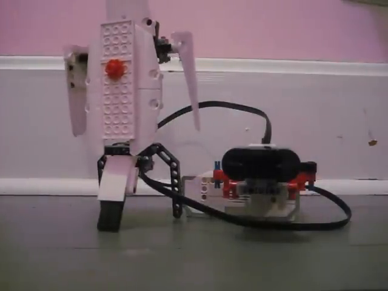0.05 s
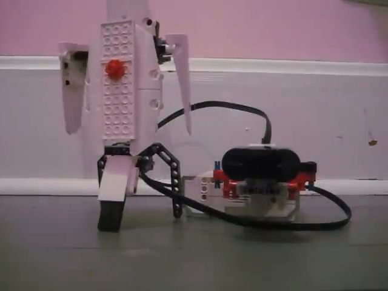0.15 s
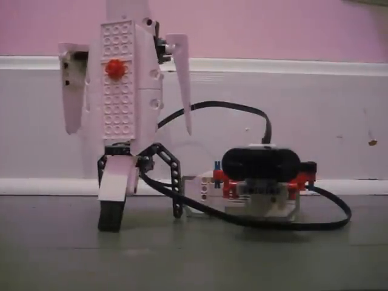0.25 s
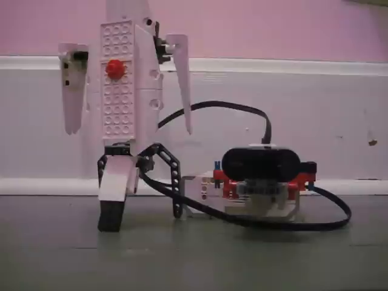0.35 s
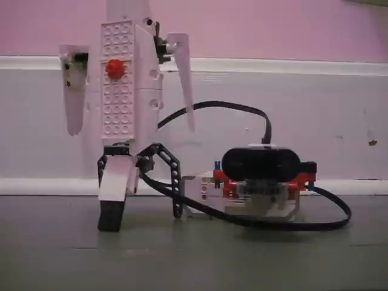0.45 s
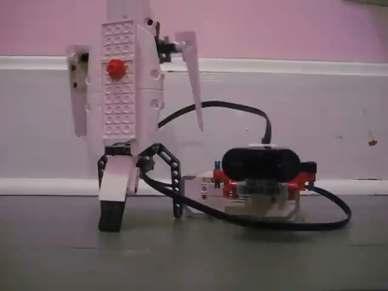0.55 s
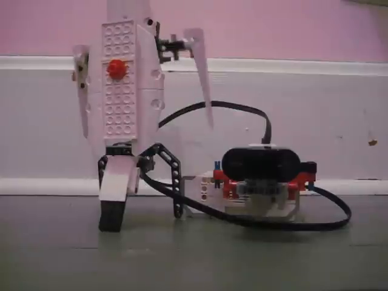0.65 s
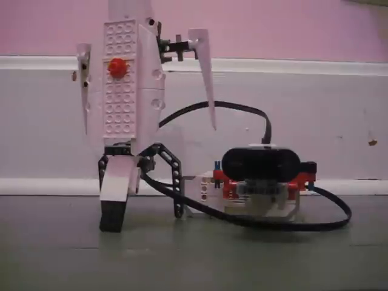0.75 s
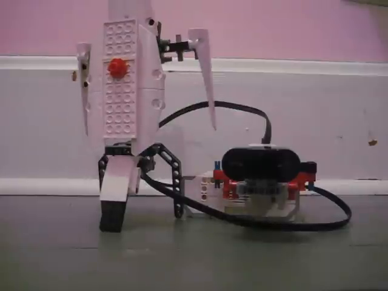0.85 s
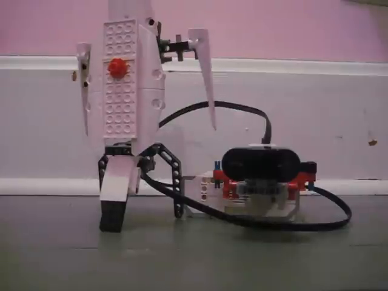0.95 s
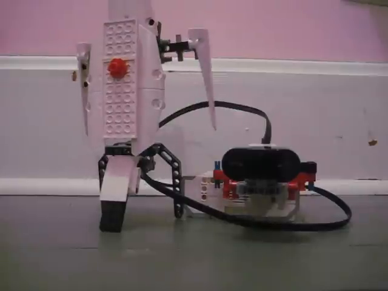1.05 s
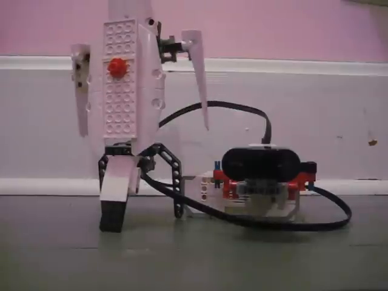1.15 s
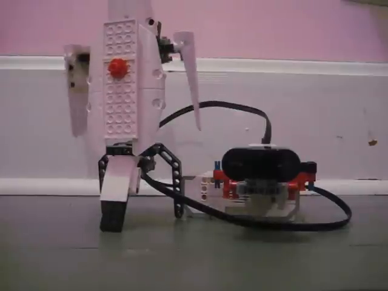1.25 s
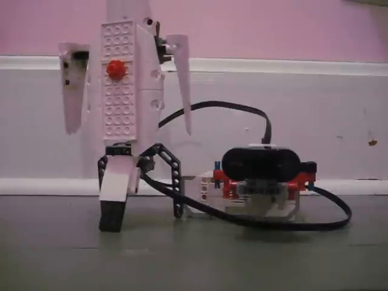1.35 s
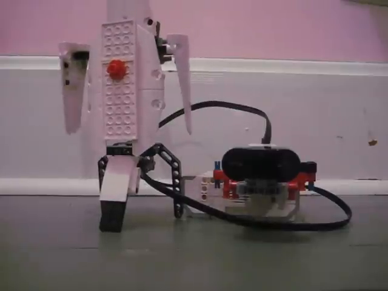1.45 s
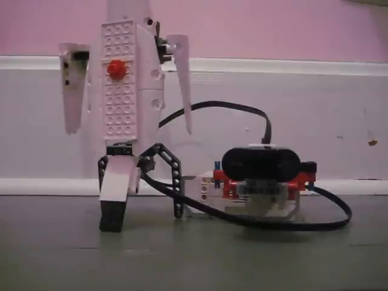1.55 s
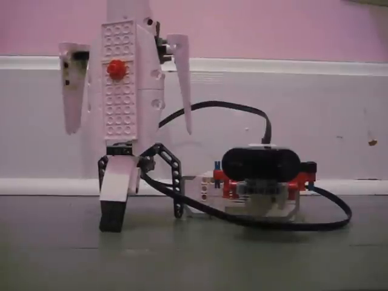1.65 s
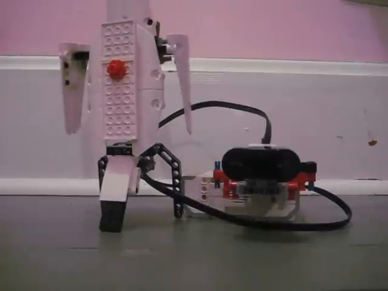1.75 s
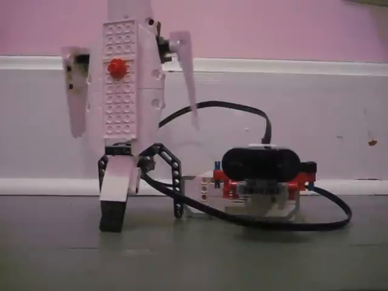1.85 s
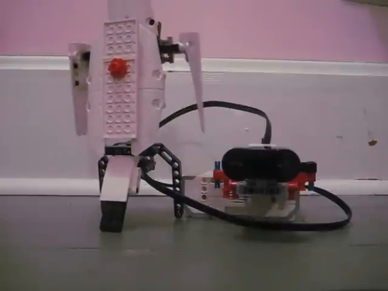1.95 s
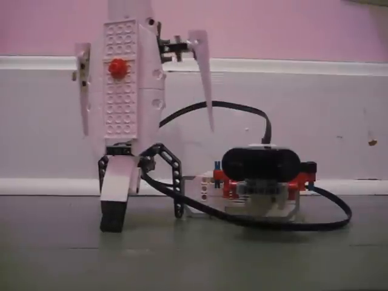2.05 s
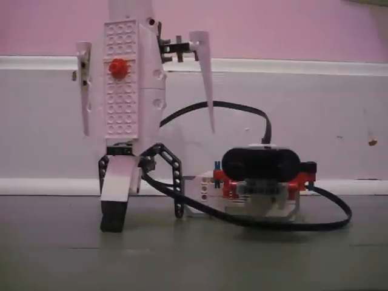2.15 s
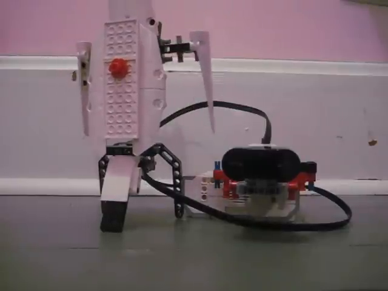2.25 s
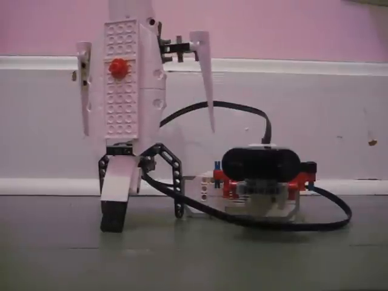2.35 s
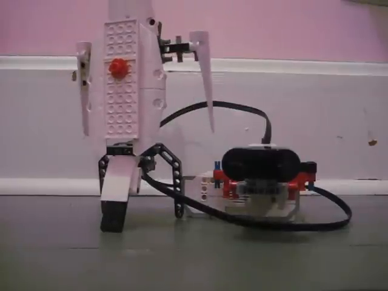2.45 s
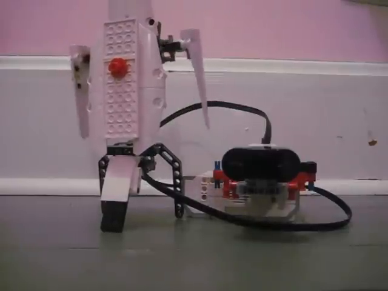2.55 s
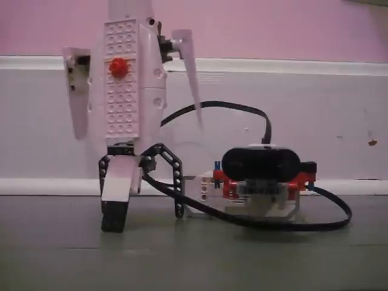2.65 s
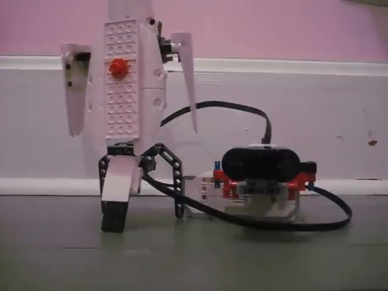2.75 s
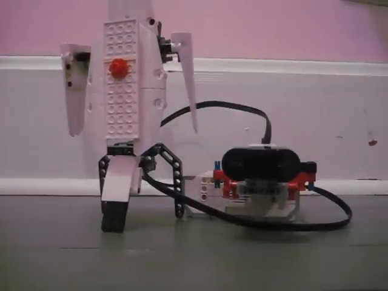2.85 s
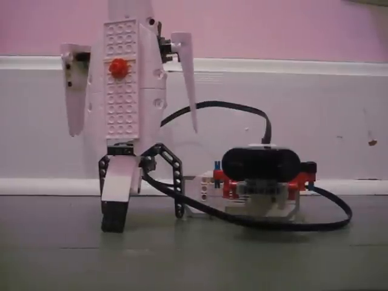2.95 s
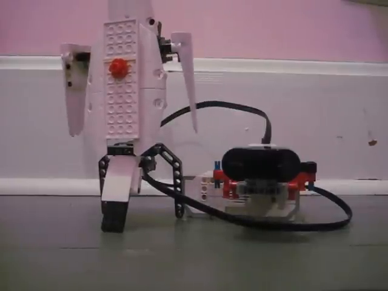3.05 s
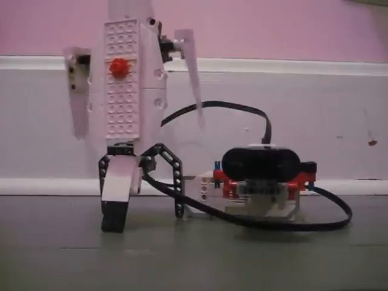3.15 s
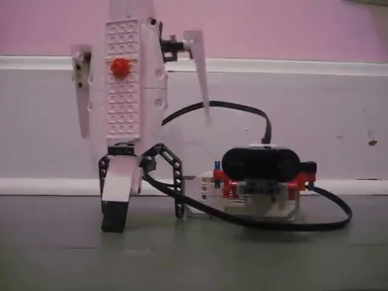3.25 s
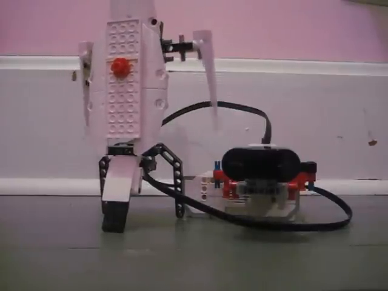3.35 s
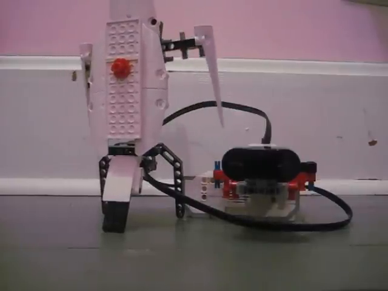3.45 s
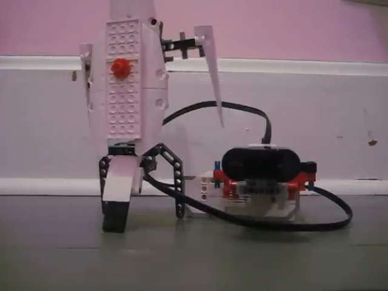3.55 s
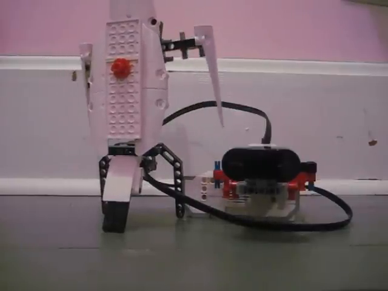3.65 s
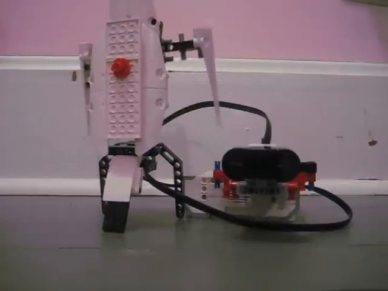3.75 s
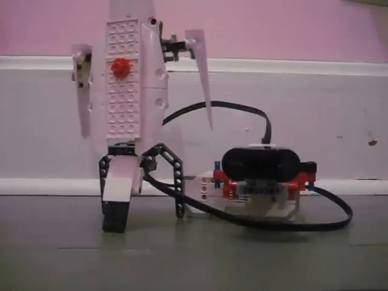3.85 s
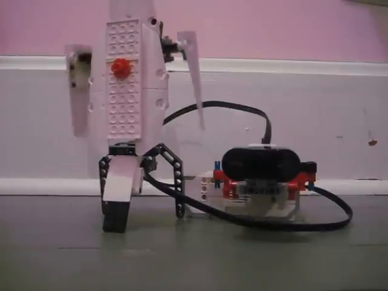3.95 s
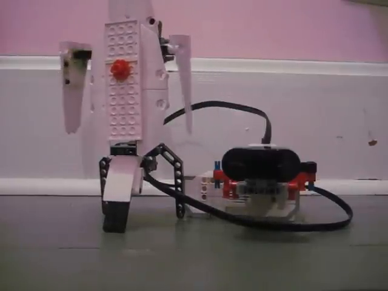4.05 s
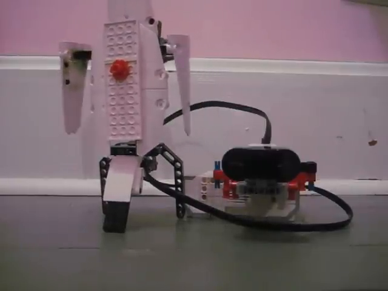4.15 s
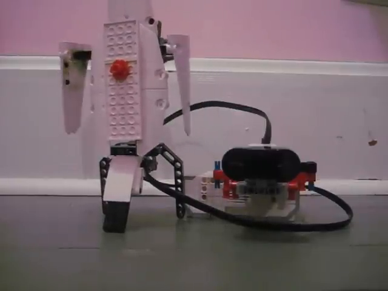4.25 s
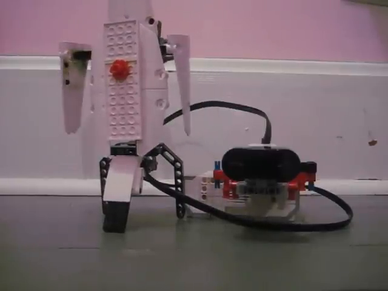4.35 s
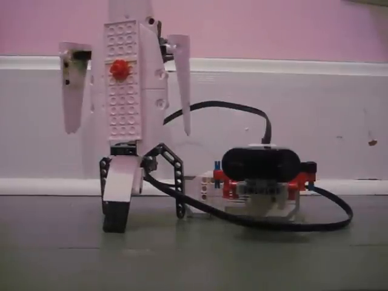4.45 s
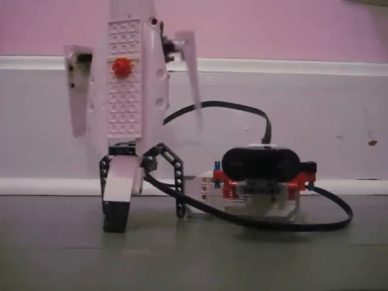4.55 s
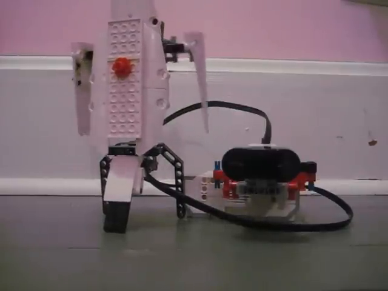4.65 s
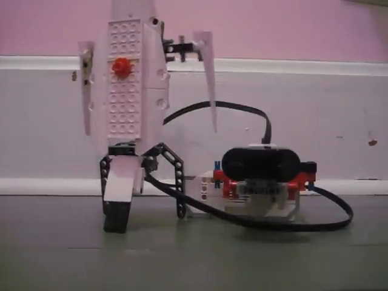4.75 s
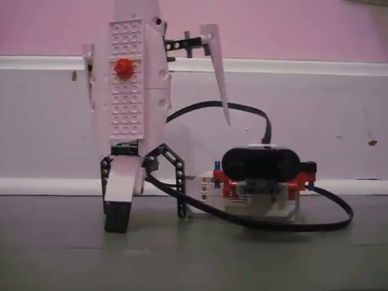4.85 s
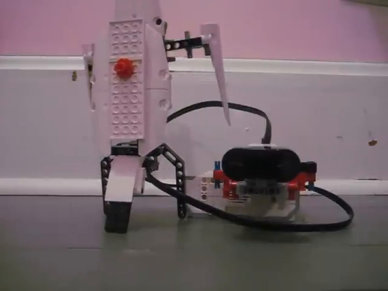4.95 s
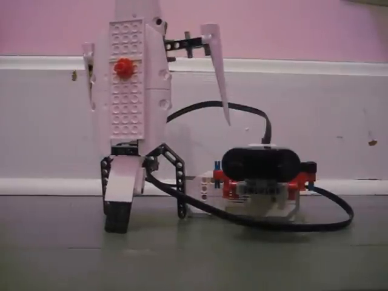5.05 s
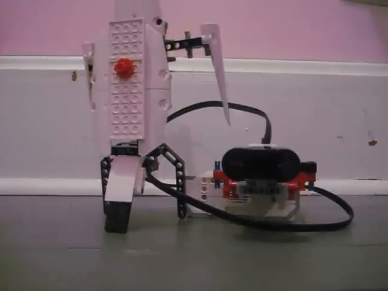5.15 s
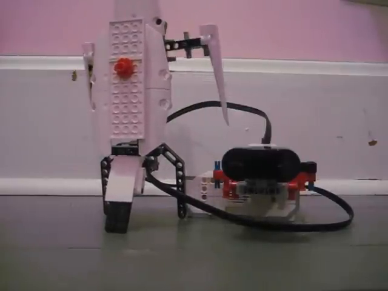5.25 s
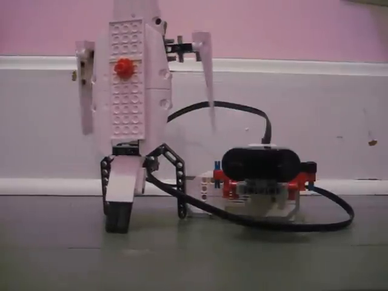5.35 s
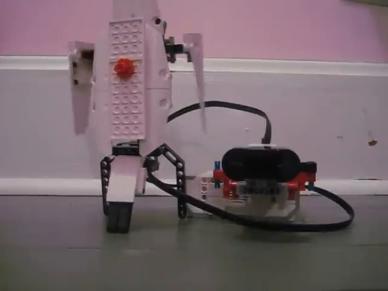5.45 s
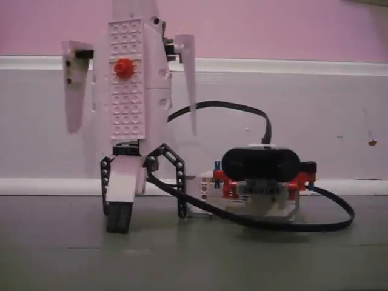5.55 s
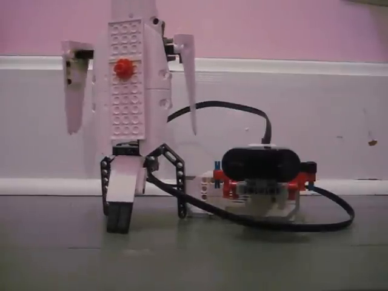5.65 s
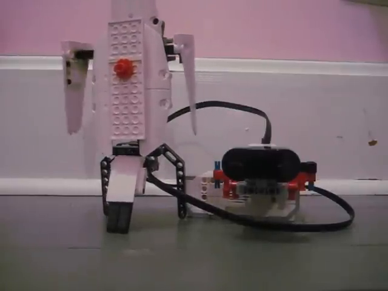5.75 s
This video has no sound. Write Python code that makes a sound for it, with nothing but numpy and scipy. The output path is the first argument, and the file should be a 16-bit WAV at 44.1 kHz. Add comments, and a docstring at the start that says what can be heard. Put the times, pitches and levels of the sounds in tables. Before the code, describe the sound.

A toy robot swings its arms out and back, its small servo motor driving plastic gears in nine short rasping bursts, evenly paced. The whine wavers with the load, outward strokes sound higher with tiny squeals, and the arms knock lightly as they shift and stop. Soft hiss and a faint electronic whistle fill the gaps. A joint ticks before the last stroke. The microphone is close, in a small room.

```python
"""A small room, one microphone close to a plastic toy robot on the floor. Its arms are already pulling back,
then swing out and back four times: a servo motor drives rasping plastic gears whose whine wavers with
the load, the frame hums, and the arms knock as they shift and stop. In the pauses, room hiss and a faint
electronic whistle remain. Before the last stroke a loose joint ticks and a faint hum sets in."""
import sys
import numpy as np
from scipy import signal
from scipy.fft import rfft, irfft
from scipy.io import wavfile

SR = 44100
rng = np.random.default_rng(int(sys.argv[2]) if len(sys.argv) > 2 else 0)


def persist_wave(psi):
    """Save psi, clipped to +-1, as 16-bit WAV."""
    counts = np.round(np.clip(psi, -1, 1) * 32767).astype(np.int16)
    wavfile.write(sys.argv[1], SR, np.atleast_2d(counts).T)


N = 255780
TIME = np.arange(N) / SR

# Arm strokes, out and back. Each row: start, stop, spin-up time and lag on the course in seconds, rasp and
# braking grind in dB, moment of the frame's sway in seconds, sway and braking jolt in relative dB.
OUT_STROKES = [(.440, .700, .03, 0.0061, -21.5, -46, 0.56, -38, -42),
               (1.814, 2.075, 0.029, .012, -21.5, -44, 1.87, -43, -69),
               (3.100, 3.383, .035, -.005, -22, -31.5, 3.30, -46, -41.5),
               (4.491, 4.829, .07, .026, -20.6, -31, 4.76, -41.5, -36.5)]
BACK_STROKES = [(-.155, .135, .03, -0.0013, -21, -29, 0.062, -67, -38),
                (1.057, 1.331, .03, -0.0029, -20.5, -25.5, 1.27, -42, -42.5),
                (2.441, 2.683, .04, -.015, -20, -44, 2.583, -45, -46),
                (3.733, 4.049, .04, .008, -20, -28, 3.942, -39, -35.5),
                (5.236, 5.561, .055, 0.029, -19.5, -26.5, 5.468, -39, -35.5)]
# The servo's three surges within a stroke. Each row: seconds into the stroke, tooth rate in Hz,
# high and low rasp in dB against the stroke's level, whine in dB against the high rasp.
OUT_COURSE = [(.025, 1850, 0, -18, -8.5), (.065, 2152, 0.4, -13.5, -3.5), (.113, 1820, -2, -20, -2),
              (.143, 2220, 1.3, -19, -5), (.172, 2078, -0.3, -9, -15), (.21, 1949, -2, -20.5, -21),
              (.26, 2170, 1.5, -17, -16)]
BACK_COURSE = [(.04, 1700, 0.075, -9, -7), (.09, 1460, -1, -15, -18), (.145, 1638, 0.85, -12, -5.5),
               (.20, 1442, -0.85, -13.5, -14.5), (.25, 1700, 0.34, -13, -9),
               (.305, 1496, -0.0069, -14.5, -12.5)]
# Gear noise from close by, in each direction. Each row: frequency in Hz, level in relative dB.
OUT_SPECTRUM = [(120, -40), (200, -21), (223, -10.5), (316, -6), (386, -12.5), (656, -9), (2110, -2),
                (2630, -5.5), (2890, -4), (3160, -6.5), (3590, -3.5), (4010, -7.5), (5780, -2),
                (9470, -14.5), (15800, -14.5)]
BACK_SPECTRUM = [(120, -55), (200, -31), (215, -21.5), (316, -16), (379, -22.5), (633, -14.5), (1550, -4.5),
                 (2400, -4), (2830, -3), (4480, -1.5), (5680, 0.5), (8800, -9), (9820, -13.5), (13700, -13),
                 (15800, -13.5)]
def gearbox():
    """The gear train runs in both directions and shakes the frame."""
    crawl_hz = 1049
    out_hz, out_high, out_low, out_whine, out_hum = servo(OUT_STROKES, OUT_COURSE)
    back_hz, back_high, back_low, back_whine, back_hum = servo(BACK_STROKES, BACK_COURSE)
    tooth_hz = crawl_hz + out_hz + back_hz
    teeth = np.cumsum(tooth_hz * (1 + .022 * drift(300))) / SR
    force = tooth_contacts(teeth) * from_db(1.4 * drift(75))
    outward = rasp(force, OUT_SPECTRUM, tooth_hz / 1950, out_high, out_low, split_hz=1370)
    backward = rasp(force, BACK_SPECTRUM, tooth_hz / 1520, back_high, back_low, split_hz=1110)
    tone = (out_whine + back_whine) * whine(teeth)
    hum = (out_hum + back_hum) * frame_hum(force)
    return outward + backward + tone + hum


def servo(strokes, course):
    """The motor spins up, surges and brakes: tooth rate above its crawl, then rasp, whine and hum gains."""
    course_s, *columns = np.transpose(course)
    cut_in_s, build_s, spin_down_s, release_s = .011, .022, .045, .018
    controls = np.zeros((5, N))
    for start, stop, spin_up_s, lag, db, grind_db, sway_at, sway_db, jolt_db in strokes:
        age, braking = np.maximum(TIME - start, 0), TIME - stop
        hz, high_db, low_db, whine_db = [np.interp(age - lag, course_s, c) for c in columns]
        spin = np.clip(age / spin_up_s, 0, 1) * np.clip(.5 - braking / spin_down_s, 0, 1)
        attack = np.minimum(age / cut_in_s, 1) * (1 - .88 * np.exp(-np.minimum(age / build_s, 20)))
        running = attack * np.exp(-np.clip(braking / release_s, 0, 20))
        sway = from_db(sway_db) * swell(sway_at, .029)
        # Braking grinds the gears, then jolts the frame.
        grind = from_db(grind_db) * swell(stop + .013, .017)
        jolt = from_db(jolt_db) * swell(stop + .029, .029)
        high = running * from_db(db + high_db)
        low = running * from_db(db + low_db) + grind
        hum = running * from_db(-51.5) + sway + jolt
        above_crawl_hz = spin * (hz - 1049)
        controls += [above_crawl_hz, high, low, high * from_db(whine_db), hum]
    return controls


def tooth_contacts(teeth, spread_db=6.0, teeth_per_turn=9.7):
    """Each tooth lands with its own force and slides; the pressure swells once a turn of the pinion."""
    strength = from_db(spread_db * np.clip(rng.standard_normal(N), -2, 2))
    landings = cut(np.diff(np.floor(teeth), prepend=0) * strength, 1030, "high")
    sliding = from_db(2.5) * rng.standard_normal(N)
    pressure = 1 + .062 * np.sin(2 * np.pi * teeth / teeth_per_turn)
    return rms_one((from_db(-6.5) * rms_one(landings) + sliding) * pressure)


# Gear housing resonances. Each row: frequency in Hz, width in Hz, level in dB against the broad rasp.
HOUSING_MODES = [(1250, 46, -8.5), (1585, 360, -8), (2200, 52, -8), (2878, 103, -3), (3470, 110, -3.5),
                 (3750, 57, -2.5), (5044, 220, -5.5), (5650, 240, -5), (6020, 160, -12), (6420, 106, -6),
                 (7140, 350, -5), (8780, 600, -5.5), (11940, 370, -8), (13150, 400, -9.5)]
def rasp(force, spectrum, speed, high_gain, low_gain, split_hz):
    """Tooth contacts ring in the housing, whose resonances come and go as the load shifts."""
    ringing = sum(from_db(db + 5.0 * drift(25)) * resonate(force, hz, width)
                  for hz, width, db in HOUSING_MODES)
    shell = colour(force + ringing, spectrum)
    low = irfft(rfft(shell) / (1 + (np.fft.rfftfreq(N, 1 / SR) / split_hz) ** 4), N)
    low_size = np.std(cut(shell, [500, 1300], "band"))
    high_size = np.std(cut(shell, 2500, "high"))
    # Faster and harder contacts are brighter.
    glint = cut(shell, 8100, "high", order=1) * (speed ** 1.6 * from_db(1.67 * drift(27)) - 1)
    return low_gain * low / low_size + high_gain * (shell - low + glint) / high_size


def whine(teeth, flutter_db=3.0):
    """Two gear meshes sing with the speed, a fourth apart; loose teeth roughen them."""
    partials = [(1, -1.1), (4 / 3, -10.5), (2, -14.0), (8 / 3, -15.5), (3, -15.5), (4, -15.5)]
    return sum(from_db(db + flutter_db * drift(160)) * np.sin(2 * np.pi * ratio * teeth)
               for ratio, db in partials)


def frame_hum(force):
    """The running motor keeps the frame's lowest modes ringing."""
    sway = np.sin(2 * np.pi * np.cumsum(179 + 6.7 * drift(44)) / SR)
    rumble = rms_one(resonate(force, hz=303, width_hz=57))
    return from_db(3.0) * sway + from_db(-8.0) * rumble


# Squeals on the outward strokes. Each row: moment in seconds, lower and upper pitch in Hz, level in dB.
SQUEALS = [(.512, 2135, 2842, -17), (1.892, 2153, 2896, -18), (3.161, 2078, 2794, -23),
           (3.360, 2169, 2907, -20.5), (4.781, 2164, 2885, -21)]
def squeals(half_length_s=.008, upper_db=-4.0):
    """At top speed both meshes hit housing resonances for a moment."""
    phase_per_hz = 2 * np.pi * np.cumsum(1 + .006 * drift(150)) / SR
    return sum(from_db(db) * swell(at_s, half_length_s)
               * (np.sin(lower * phase_per_hz) + from_db(upper_db) * np.sin(upper * phase_per_hz))
               for at_s, lower, upper, db in SQUEALS)


# Blows as the arms shift and stop. Each row: start in seconds, frame thud and arm clack in relative dB.
KNOCKS = [(.140, -30, -39), (0.529, -26, -46), (0.61, -24, -45), (1.318, -25, -43), (1.340, -15.5, -15),
          (1.437, -56, -38), (1.992, -21.5, -42), (2.575, -33, -28), (3.258, -19.5, -41), (3.373, -22, -32),
          (4.038, -20.5, -34), (4.595, -23, -41), (4.680, -20, -39), (4.80, -29, -29), (4.937, -53, -42),
          (5.558, -20, -41), (5.574, -35, -22)]
# Modes of frame and arms. Each row: frequency in Hz, level in relative dB, seconds to fall by 60 dB.
FRAME_MODES = [(255, -2.5, 0.018), (318, -0.5, 0.077), (370, -3.5, 0.026), (435, -10.5, 0.059),
               (510, -12, 0.043)]
ARM_MODES = [(820, -6, 0.021), (1022, -6, 0.087), (1124, 2, 0.068), (1250, 1.5, 0.099), (1170, -25.5, 0.56),
             (1300, -18, .15), (1620, -20, .06), (2270, -13, 0.056), (3550, -6, 0.041)]
def knocks(chatter_db=-22.0, chatter_s=.011):
    """A blow rings the frame; the loosely pinned arms chatter on briefly."""
    thud, clack = np.zeros((2, N))
    age = np.arange(SR // 20) / SR
    for start, thud_db, clack_db in KNOCKS:
        chatter = cut(rng.standard_normal(len(age)), 570, "high") * np.exp(-age / chatter_s)
        at = round(start * SR)
        thud[at] += from_db(thud_db)
        clack[at:at + len(age)] += from_db(clack_db) * ((age == 0) + from_db(chatter_db) * chatter)
    blows = sum(from_db(db) * ring(force, hz, t60) * (-1) ** k
                for force, modes in ((thud, FRAME_MODES), (clack, ARM_MODES))
                for k, (hz, db, t60) in enumerate(modes))
    return from_db(-2.0) * blows


# A joint settling after the last outward stroke. Each row: start in seconds, level in dB.
JOINT_TICKS = [(4.946, -28.5)]
def joint_tick(decay_s=.0019):
    """A loose joint settles with a tiny bright snap of plastic on plastic."""
    snap = sum(from_db(db) * (TIME > start) * np.exp(-np.clip((TIME - start) / decay_s, 0, 20))
               for start, db in JOINT_TICKS)
    return snap * rms_one(resonate(rng.standard_normal(N), hz=5630, width_hz=840))


# The small room's reverberation. Each row: frequency in Hz, seconds to fall by 60 dB.
ROOM_T60 = [(150, 0.68), (1000, 0.34), (3000, 0.37), (6000, 0.36), (14000, 0.27)]
def room(direct, wet_db=-13.0, build_s=.012):
    """Dense reflections reach the microphone from near walls and floor, dying faster in the treble."""
    age = np.arange(SR // 2) / SR
    edges_hz = np.geomspace(200, 16000, 8)
    tail = np.zeros(len(age))
    for lo, hi in zip(edges_hz, edges_hz[1:]):
        decay = np.exp(-np.log(1000) * age / at_hz(ROOM_T60, np.sqrt(lo * hi)))
        tail += cut(rng.standard_normal(len(age)), [lo, hi], "band") * decay
    tail *= np.clip(age / build_s, 0, 1)
    return direct + from_db(wet_db) * signal.fftconvolve(direct, tail / np.linalg.norm(tail))[:N]


# The room's hiss at the microphone. Each row: frequency in Hz, level in relative dB.
HISS_SPECTRUM = [(15, -38), (25, -14), (59, -5.5), (123, -7), (148, -4), (184, -5.5), (241, -9.5),
                 (392, -3), (710, -7), (834, -3.5), (1550, -9), (3680, -11.5), (7220, -15), (7830, -17.5),
                 (15800, -19.5)]
# Mains hum and electronic whistles. Each row: frequency in Hz, rms level in dB.
STEADY_TONES = [(118.6, -64), (1061, -62.5), (7559, -61.5), (7590, -80), (11106, -83), (13044, -81),
                (15122, -77), (15149, -74)]
# A faint hum rising near the end. Each row: time in seconds, rms level in dB.
LATE_HUM = [(5.0, -95), (5.2, -63), (5.7, -59), (5.8, -56)]
def room_tone(hiss_db=-47.1, late_hum_hz=396):
    """Behind the robot lies an even hiss with low hums and thin electronic whistles."""
    hiss = from_db(hiss_db) * rms_one(colour(rng.standard_normal(N), HISS_SPECTRUM))
    late_hum_db = np.interp(TIME, *np.transpose(LATE_HUM))
    tones = sum(from_db(db) * np.sqrt(2) * np.sin(2 * np.pi * hz * TIME + .97 * drift(2.8))
                for hz, db in STEADY_TONES + [(late_hum_hz, late_hum_db)])
    return hiss + tones


def from_db(db):
    """Decibels to gain."""
    return 10 ** (np.asarray(db) / 20)


def rms_one(x):
    """Scale to unit power."""
    return x / np.sqrt(np.mean(x ** 2) + 1e-20)


def at_hz(points, hz):
    """Read a table on a log-frequency axis."""
    points_hz, values = np.transpose(points)
    return np.interp(np.log(np.maximum(hz, 1)), np.log(points_hz), values)


def colour(x, spectrum):
    """Shape a steady signal with a smooth spectrum."""
    return irfft(rfft(x) * from_db(at_hz(spectrum, np.fft.rfftfreq(N, 1 / SR))), N)


def cut(x, hz, kind, order=2):
    """Butterworth filter."""
    return signal.sosfilt(signal.butter(order, hz, kind, fs=SR, output="sos"), x)


def drift(rate_hz):
    """A smooth random wander of unit power."""
    return rms_one(cut(rng.standard_normal(N + SR), rate_hz, "low")[SR:])


def swell(at_s, half_length_s):
    """A bell-shaped rise and fall around a moment."""
    return np.exp(-np.minimum(((TIME - at_s) / half_length_s) ** 2, 30))


def resonate(x, hz, width_hz):
    """A resonance with gain 1 at its peak."""
    r, w = np.exp(-np.pi * width_hz / SR), 2 * np.pi * hz / SR
    return signal.lfilter(np.array([1, 0, -1]) * (1 - r * r) / 2, [1, -2 * r * np.cos(w), r * r], x)


def ring(force, hz, t60):
    """A unit click sets a sine of height 1 ringing."""
    r, w = np.exp(-np.log(1000) / (t60 * SR)), 2 * np.pi * hz / SR
    return signal.lfilter([0, np.sin(w)], [1, -2 * r * np.cos(w), r * r], force + 1e-18)


def scene():
    """The robot on the floor of its small room, in mono from close by."""
    robot = gearbox() + squeals() + knocks() + joint_tick()
    return (room(robot) + room_tone())[None]


def record(dry):
    """The microphone's signal is cut steeply above 15750 Hz."""
    return signal.sosfilt(signal.ellip(12, .1, 80, 15750, fs=SR, output="sos"), dry)


dry = scene()
out = record(dry)
persist_wave(out)
```